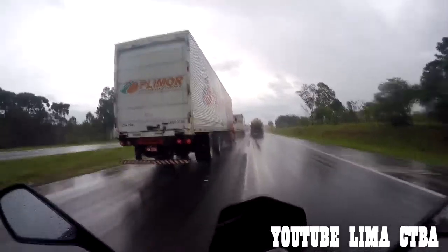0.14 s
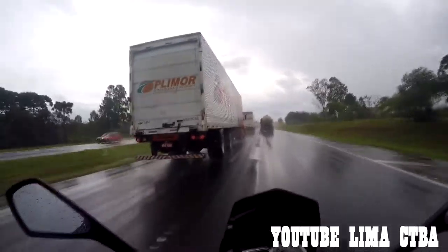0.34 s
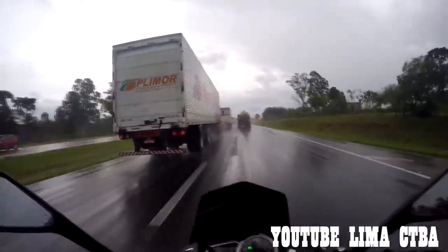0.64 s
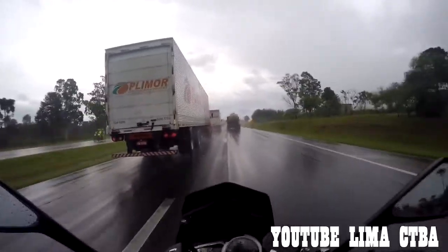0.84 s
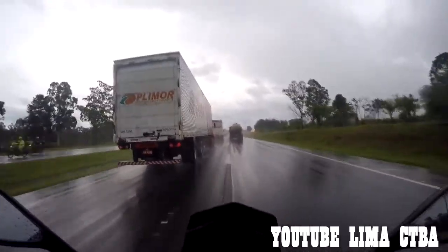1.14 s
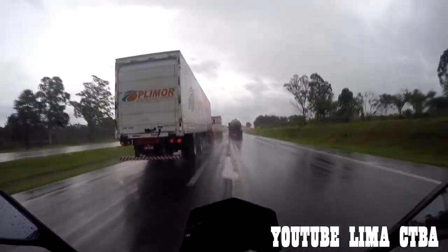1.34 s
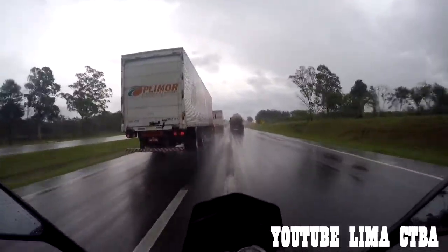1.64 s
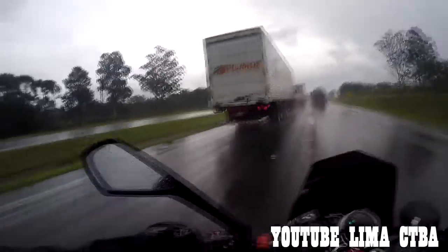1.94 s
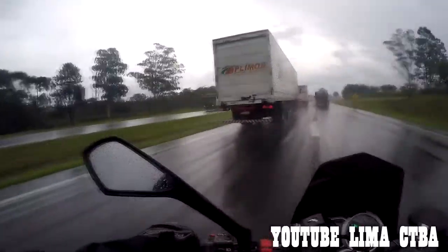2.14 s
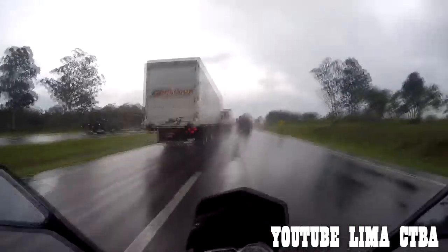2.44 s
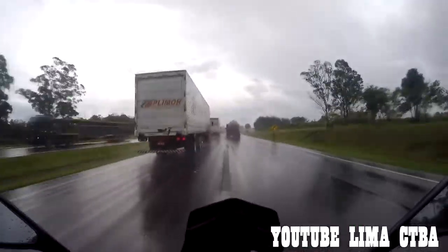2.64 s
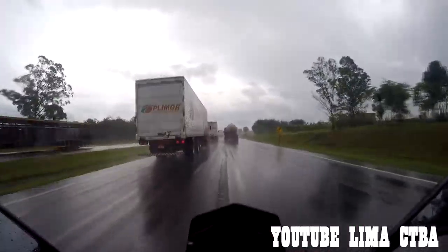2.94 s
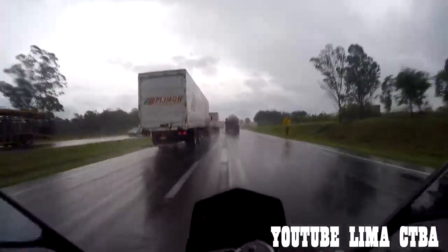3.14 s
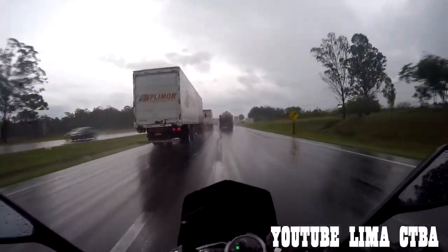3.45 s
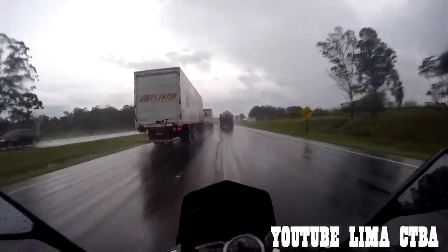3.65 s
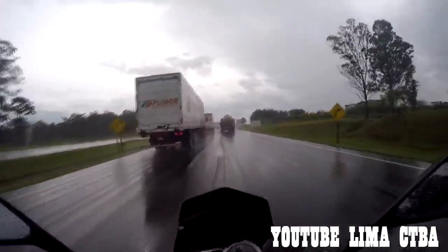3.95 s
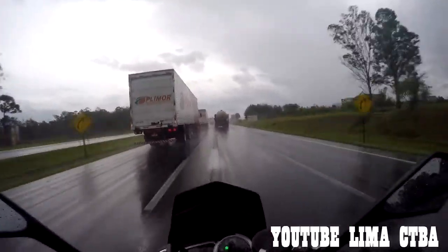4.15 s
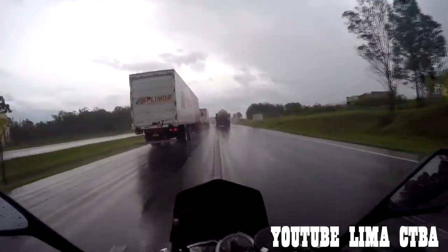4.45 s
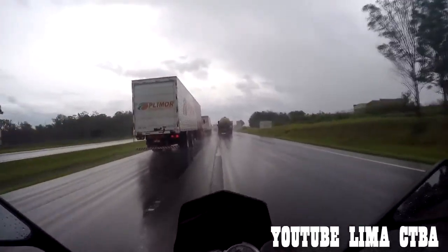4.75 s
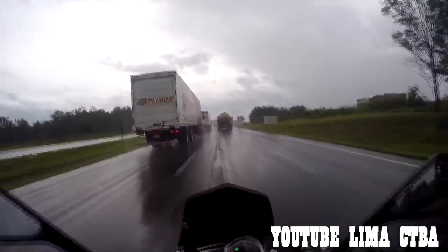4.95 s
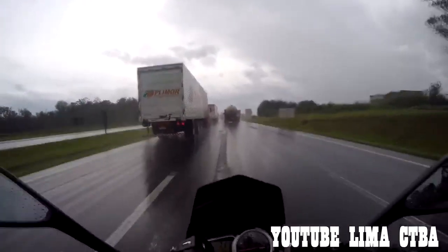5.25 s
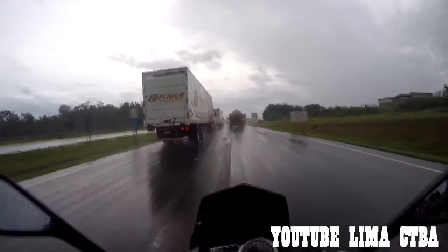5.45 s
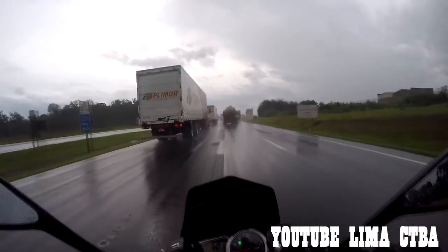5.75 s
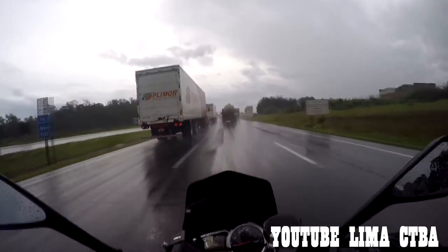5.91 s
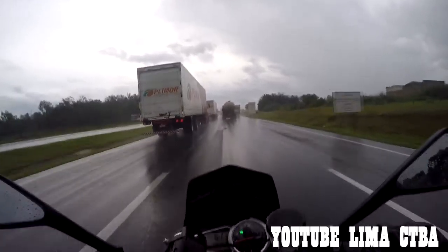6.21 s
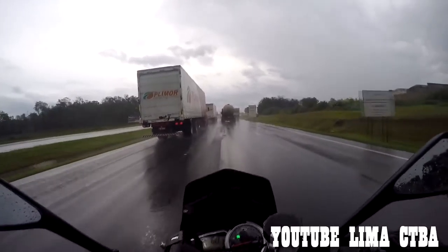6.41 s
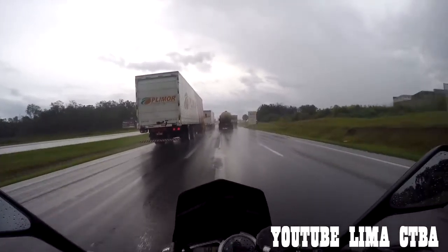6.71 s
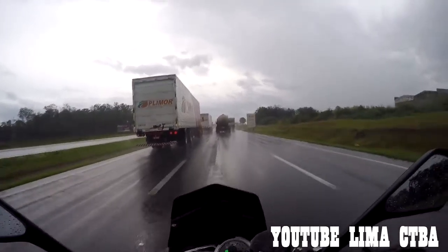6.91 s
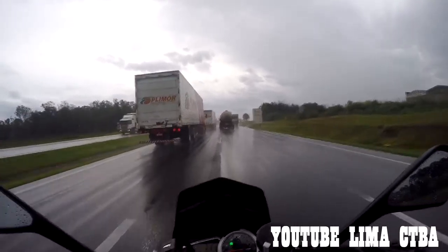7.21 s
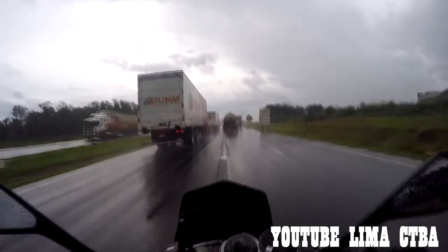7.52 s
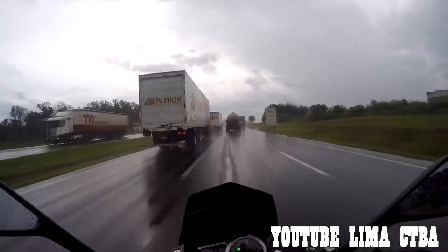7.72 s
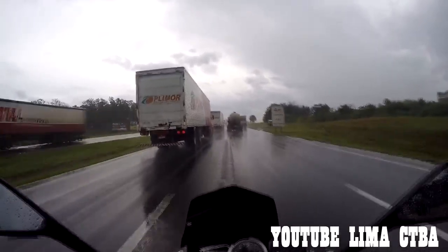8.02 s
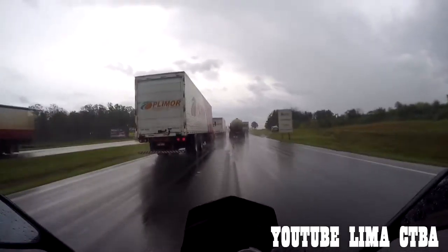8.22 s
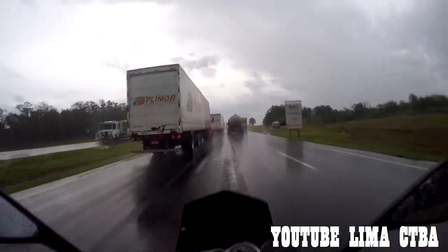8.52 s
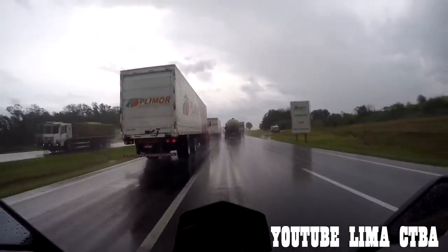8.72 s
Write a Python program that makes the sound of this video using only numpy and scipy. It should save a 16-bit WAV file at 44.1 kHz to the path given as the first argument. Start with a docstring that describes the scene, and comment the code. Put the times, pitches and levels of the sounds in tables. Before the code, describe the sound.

A motorcycle engine drones at cruising speed on a wet highway, with gusty wind buffeting the microphone and tyres hissing.

```python
"""A three-cylinder motorcycle cruises on a wet highway, heard from the rider's seat.
Periodic gas pulses make the exhaust drone, and tooth meshing makes the gears whine. The throttle
opens and eases three times: the engine's harmonics swell under load and the drone burbles when coasting.
Turbulent pressure buffets and crackles on the microphone, over the broadband rush of air and tyres."""
import sys
import numpy as np
from scipy import signal
from scipy.fft import rfft, irfft, next_fast_len
from scipy.io import wavfile
from scipy.ndimage import uniform_filter1d

SR = 44100
rng = np.random.default_rng(int(sys.argv[2]) if len(sys.argv) > 2 else 0)


def to_wav(sig):
    """Store sig (one row per channel, or 1-D mono) as 16-bit WAV at the path in sys.argv[1].

    Samples outside -1..1 are clipped; the rate is SR.
    """
    pcm = np.clip(np.atleast_2d(sig), -1, 1) * 32767
    pcm = np.round(pcm).astype(np.int16)
    wavfile.write(sys.argv[1], SR, pcm.T)  # frames by channels


N = 391166
T = np.arange(N) / SR
CRUISE_HZ = 138.9   # reference firing rate


# Slow course of the exhaust's fundamental: t/s, level/dB
DRONE_LEVEL = [(0, -20.5), (.7, -18.5), (1.1, -20), (1.75, -16), (2.2, -23), (2.7, -19), (4.2, -17.5),
               (4.7, -19), (5.25, -16), (5.7, -17.5), (6.85, -16.5), (7.3, -18), (7.8, -18), (8.3, -20),
               (8.87, -22)]

def exhaust_drone(firings, load_db, lull_db):
    """Gas pulses radiate a tone at the firing rate; random modulation makes it burble when coasting."""
    level_db, = in_time(DRONE_LEVEL)
    coasting = np.clip(1 - from_db(load_db), 0, 1)
    depth = 0.036 + 0.4 * coasting
    phase = 2 * np.pi * firings
    burble = drift(49) * np.sin(phase) + drift(42) * np.cos(phase)
    tone = (np.sqrt(2) * np.sin(phase) + depth * burble) / np.sqrt(1 + depth ** 2)
    return from_db(level_db - lull_db + 1.1 * drift(3.3)) * tone


# Resonance curve of the exhaust pipe: f/Hz, level/dB
PIPE_RESPONSE = [(255, -28), (268, -23), (280, -24.5), (292, -30), (308, -37.5), (319, -29), (384, -38),
                 (405, -31), (430, -26.5), (452, -32), (480, -34.5)]

def pipe_harmonics(firings, firing_hz, load_db):
    """Resonance: the second and third harmonics swell as they cross the pipe's modes, and with load."""
    out = np.zeros(N)
    for multiple, load_share in ((2, 0.62), (3, 1)):
        level_db = at_hz(PIPE_RESPONSE, multiple * firing_hz) + load_share * load_db
        out += harmonic(multiple, firings, level_db, flutter_db=2.13, waver_rad=0.08)
    return out


# Firing rate, rising in each pull and sinking between: t/s, f/Hz
FIRING_RATE = [(0, 128.4), (1.1, 136.4), (1.5, 133.8), (2, 129.3), (2.4, 127.9), (3, 132.5), (4.78, 144.1),
               (5.5, 135.3), (5.75, 134.1), (6, 135.9), (6.5, 140.2), (7.5, 150.8), (8.5, 160.1),
               (8.87, 156.4)]

def crank():
    """Phase is the integral of frequency: the slightly jittered count of firings, and the firing rate."""
    firing_hz, = in_time(FIRING_RATE)
    return np.cumsum(firing_hz * (1 + 0.00074 * drift(12))) / SR, firing_hz


# Throttle pulls: opening t/s, rise time/s, closing t/s, load level/dB, coasting level/dB,
# then the gain/dB of the low whine, the upper whine and the whistle
PULLS = [(-.3, 0.62, 1.14, 1, -12, -9.5, -1.5, -0.5), (1.62, 0.8, 4.55, 2, -8.5, -14, -0.5, 0.5),
         (5.62, 0.3, 8.6, 0, -21, -2, 1, -1)]

def throttle(close_s=0.11, ease_db_per_s=1.74):
    """Load follows the throttle, which opens, eases and shuts; each pull also sets three gear gains."""
    load_db, gear_db = PULLS[0][4], np.array(PULLS[0][5:])[:, None]
    for opens, rise_s, closes, pull_db, coast_db, *tones_db in PULLS:
        opening = np.clip((T - opens) / rise_s, 0, 1)
        closing = np.clip((T - closes) / close_s, 0, 1)
        load_db = load_db + opening * (pull_db - ease_db_per_s * (T - opens) - load_db)
        load_db = load_db + closing * (coast_db - load_db)
        gear_db = gear_db + opening * (np.array(tones_db)[:, None] - gear_db)
    return load_db, gear_db


# Engine overtones, the thirds due to unequal cylinders: multiple of the firing rate, relative level/dB
OVERTONES = [(2.33, -43), (3.33, -38.5), (3.67, -46), (4, -40), (4.33, -47), (5, -49), (5.33, -50),
             (5.67, -53), (6, -45), (6.33, -51), (7, -53), (7.33, -55), (8, -48), (8.33, -53), (8.67, -54),
             (9, -49), (9.33, -50), (9.67, -58), (10, -56), (10.33, -61), (10.67, -57), (11, -54),
             (11.33, -58), (12, -58), (12.33, -64), (13, -62), (15, -68), (16, -66)]
# Resonance curve of the cases and fairing: f/Hz, gain/dB
BODY_RESPONSE = [(300, 1), (900, 0), (1050, 3), (1220, 2), (1450, 2), (1600, 3.5), (1750, 5), (1950, -2),
                 (2120, 7), (2300, -7.5), (3600, -7), (3930, -2.5), (4120, 3), (4400, -4), (4750, -5.5),
                 (5100, -15.5)]

def engine_overtones(firings, firing_hz):
    """Source and filter: harmonics of the engine cycle excite the body, brighter at high revs."""
    tilt_db_per_octave = 0.0935 * (firing_hz - CRUISE_HZ)
    out = np.zeros(N)
    for multiple, db in OVERTONES:
        gain_db = at_hz(BODY_RESPONSE, multiple * firing_hz) + tilt_db_per_octave * np.log2(multiple / 9)
        out += harmonic(multiple, firings, db + gain_db, flutter_db=3.5, waver_rad=0.16)
    return out


# Spectral envelope of the clatter at mean engine speed: f/Hz, relative level/dB of each harmonic
RASP_SPECTRUM = [(500, -56), (900, -59), (1250, -62), (1700, -64), (2100, -68), (2500, -79), (3000, -82),
                 (3600, -83), (3900, -90)]

def valve_rasp(firings, firing_hz, rough_db=6.0):
    """Fourier series: valve and intake clatter repeats every three firings, with uneven strength."""
    size = 4096
    hz = np.arange(size // 2 + 1) * firing_hz.mean() / 3
    in_band = (hz > RASP_SPECTRUM[0][0]) & (hz < RASP_SPECTRUM[-1][0])
    amplitudes = from_db(at_hz(RASP_SPECTRUM, hz)) * in_band
    cycle = irfft(amplitudes * np.exp(2j * np.pi * rng.random(len(hz)))) * size / np.sqrt(2)
    position = firings / 3 % 1 * size
    return np.interp(position, np.arange(size), cycle) * from_db(rough_db * drift(65))


# Meshing tones (low whine, upper whine, two whistles): multiple of the firing rate, line width/Hz
GEAR_TONES = [(7, .9), (7.58, 2.5), (30.7, 14), (32.0, 24)]

def gear_whine(firings, firing_hz, load_db, gear_db, flutter_db=3.0):
    """Tooth meshing gives tones that grow with load; play in the gears broadens them by phase noise."""
    low_db, upper_db, high_db = gear_db + load_db
    revs_db = 0.214 * (firing_hz - CRUISE_HZ)
    levels = (low_db + revs_db - 38.5, upper_db + revs_db - 41.5, high_db - 68.5, high_db - 68.5)
    out = np.zeros(N)
    for (multiple, width_hz), db in zip(GEAR_TONES, levels):
        phase_walk = np.cumsum(rng.standard_normal(N)) * np.sqrt(2 * np.pi * width_hz / SR)
        play = uniform_filter1d(phase_walk, size=200) + 0.12 * drift(45)
        level_db = db + at_hz(BODY_RESPONSE, multiple * firing_hz) + flutter_db * drift(25)
        out += np.sqrt(2) * from_db(level_db) * np.sin(2 * np.pi * multiple * firings + play)
    return out


# Spectrum of the eddies: f/Hz, relative level/dB
BUFFET_SPECTRUM = [(8, -14.5), (18, 8), (30, -1.5), (55, -2), (100, -4.5), (170, -17), (240, -22),
                   (350, -28.5), (700, -41), (2000, -86.5)]

def wind_buffet(level_db):
    """Turbulence: large eddies press on the microphone as low-frequency noise."""
    eddies = noise(BUFFET_SPECTRUM)
    eddies /= np.sqrt(uniform_filter1d(eddies ** 2, size=2400) + 1e-6)   # level_db sets the strength
    return from_db(level_db + 0.28) * eddies


# Spectrum of the air stream: f/Hz, relative level/dB
RUSH_SPECTRUM = [(60, -20), (150, 7), (210, 7), (330, -0.5), (470, 3.5), (600, -3), (850, -6.5),
                 (1100, -10.5), (1400, -16), (1900, -40.5), (3000, -44.5), (6000, -81.5)]

def air_rush(level_db):
    """Flow noise: air passing round the fairing gives a broad band that flutters quickly."""
    return from_db(level_db + 3.5 + 1.3 * drift(45)) * noise(RUSH_SPECTRUM)


# Slow course of the air stream: t/s, then the relative level/dB of buffet, rush and tyre hiss
AIR_LEVELS = [(0, -19, -28, -48.5), (.55, -22.5, -29.5, -49.5), (1, -22, -27, -47.5),
              (1.3, -20, -28.5, -48.5), (1.55, -19.5, -31, -51), (2.2, -21, -29.5, -50.5),
              (2.85, -18.5, -29, -49.5), (4.1, -23.5, -29, -48.5), (4.9, -18, -27, -48.5),
              (5.12, -25, -32.5, -50.5), (5.5, -21.5, -31, -50), (6, -21, -29.5, -48.5),
              (6.9, -23, -29, -48), (7.25, -17.5, -29, -49.5), (7.55, -22.5, -33.5, -51.5),
              (8.1, -20, -29, -49.5), (8.55, -23, -29.5, -50), (8.87, -24.5, -32.5, -55)]
# Gusts on the microphone: centre t/s, duration/s, buffet gain/dB, rush gain/dB
GUSTS = [(0.127, .08, 1, 1.5), (1.152, .12, 6, 0.5), (2.1, 0.12, 1, 1.5), (2.893, .16, -3, 4),
         (4.643, 0.23, 5, -0.5), (4.823, 0.097, -8.5, 3), (5.564, .07, 8.5, 1), (5.81, .1, 8, 3.5),
         (6.86, .09, -1, 4), (7.154, .12, 2.5, 3), (7.334, .08, 5, 2.5), (7.741, 0.088, 0.5, 8),
         (8.005, 0.14, 4.5, 5.5), (8.09, .06, 3, 2), (8.4, 0.22, 6.5, 2.5), (8.507, .07, 6.5, 1.5),
         (8.709, 0.098, 12, 6)]
# Lulls in which wind and drone sink together: centre t/s, duration/s, depth/dB
LULLS = [(1.191, .08, 7.5), (1.97, .1, 1.5), (4.685, 0.087, 8), (5.096, .08, 4), (7.414, .1, 7),
         (7.54, .07, 3), (7.82, 0.091, 5), (8.155, 0.067, 4.5), (8.8, .07, 2)]

def air_stream():
    """Unsteady flow modulates the levels of buffet, rush and tyre hiss; also gives the lulls' depth."""
    buffet_db, rush_db, tyre_db = in_time(AIR_LEVELS)
    lull_db = sum(db * swell(s, length) for s, length, db in LULLS)
    thump_db = sum(db * swell(s, length) for s, length, db, _ in GUSTS) - lull_db
    gust_db = sum(db * swell(s, length) for s, length, _, db in GUSTS) - lull_db + 0.8 * drift(4.6)
    return buffet_db + thump_db + 2.5 * drift(14), rush_db + gust_db, tyre_db + 0.95 * gust_db, lull_db


# Sharp single ticks of wind crackle: t/s, relative level/dB
TICKS = [(0.147, -35), (0.3527, -37.5), (0.468, -41), (0.722, -36), (0.9844, -37), (1.029, -35),
         (1.131, -38), (1.1597, -37), (1.4182, -40), (1.927, -40), (2.1366, -38), (2.5, -40), (2.582, -38),
         (2.9188, -34), (3.161, -42), (3.404, -35), (3.5074, -39), (3.908, -37), (4.1184, -42), (4.26, -35),
         (4.562, -37), (4.8754, -41), (4.985, -38), (5.454, -40), (5.902, -42), (6.1415, -40),
         (6.4263, -37), (6.6236, -38.5), (6.8593, -36), (7.1397, -47), (7.327, -41), (8.038, -38),
         (8.4394, -42), (8.7001, -27)]
# Filter that colours each tick: f/Hz, gain/dB
TICK_RESPONSE = [(300, -1.5), (1500, 4), (3000, 5.5), (4800, 4), (7000, 1), (12000, -5), (16000, -10.5)]

def wind_crackle(pressure, rush_db, base_per_s=100, decay_s=0.00035):
    """Shot noise: tiny bursts cluster on pressure peaks, busier in strong wind, among set louder ticks."""
    per_s = base_per_s * from_db(2.6 * np.minimum(rush_db - rush_db.mean(), 3))
    strain = np.minimum(np.abs(rms_one(pressure)), 2.3) ** 4 * from_db(4 * drift(7))
    onsets = rng.random(N) < per_s / SR * strain / strain.mean()
    impulses = onsets * from_db(-55.5 + 5 * np.minimum(rng.exponential(1, N), 2))
    for s, db in TICKS:
        impulses[int(s * SR)] += from_db(db)
    envelope = signal.lfilter([1], [1, -np.exp(-1 / (decay_s * SR))], impulses + 1e-18)
    shared, left, right = rng.choice([-1, 1], (3, N))
    ears = (0.55 * shared + 0.88 * left, 0.55 * shared + 0.92 * right)   # partly correlated noise
    return np.array([colour(envelope * ear, TICK_RESPONSE) for ear in ears])


# Spectrum of tyres on the wet road: f/Hz, relative level/dB
TYRE_SPECTRUM = [(500, -20), (1200, 5.5), (2050, 2.5), (2450, -5.5), (3200, -10), (3800, -14), (4250, -14),
                 (4900, -24), (6000, -31.5), (15000, -52)]

def tyre_hiss(level_db, firings, throb=0.15):
    """Amplitude modulation: the hiss of wet tyres throbs with the engine's gas pulses."""
    pulsing = 1 + throb * np.sin(2 * np.pi * firings)
    return from_db(level_db + 3.5 + 0.15 * drift(43)) * noise(TYRE_SPECTRUM) * pulsing


# Spectrum of the faint hiss: f/Hz, relative level/dB
HISS_SPECTRUM = [(20, 24), (130, 24), (260, 5.5), (520, -7), (1000, -11.5), (2000, 6.5), (3000, -4.5),
                 (4200, -6), (5500, -15), (8000, -16), (11000, -30), (15000, -34.5)]

def stereo_hiss(tyre_db):
    """Uncorrelated noise: a faint hiss, different in each ear, rises and falls with the tyre hiss."""
    level_db = -53.5 + 0.7 * (tyre_db - tyre_db.mean())
    return from_db(level_db) * np.array([noise(HISS_SPECTRUM), noise(HISS_SPECTRUM)])


def harmonic(multiple, firings, level_db, flutter_db, waver_rad):
    """One engine partial, modulated in amplitude and phase by the moving air."""
    exact_multiple = round(3 * multiple) / 3
    phase = 2 * np.pi * (exact_multiple * firings + rng.random()) + waver_rad * drift(12)
    return np.sqrt(2) * from_db(level_db + flutter_db * drift(9.1)) * np.sin(phase)


def from_db(db):
    """Amplitude ratio of a level in decibels."""
    return np.exp(np.asarray(db) * (np.log(10) / 20))


def rms_one(x):
    """Normalisation to unit power."""
    return x / np.sqrt(np.mean(x ** 2) + 1e-20)


def in_time(rows):
    """Linear interpolation of a table's columns at every sample."""
    s, *columns = np.transpose(rows)
    return [np.interp(T, s, column) for column in columns]


def at_hz(points, hz):
    """Interpolation of a spectrum on a log-frequency axis."""
    f, db = np.transpose(points)
    return np.interp(np.log(np.maximum(hz, 1)), np.log(f), db)


def colour(x, spectrum):
    """Filtering by multiplication in the frequency domain."""
    size = next_fast_len(N)
    hz = np.arange(size // 2 + 1) * SR / size
    return irfft(rfft(x, size) * from_db(at_hz(spectrum, hz)), size)[:N]


def noise(spectrum):
    """Filtered Gaussian noise of unit power."""
    return rms_one(colour(rng.standard_normal(N), spectrum))


def drift(corner_hz):
    """Random fluctuation of unit power: noise through a two-pole low-pass."""
    step = 40   # samples between drawn points
    pole = np.exp(-2 * np.pi * corner_hz * step / SR)
    slow = signal.lfilter([1], [1, -2 * pole, pole * pole], rng.standard_normal(N // step + 2002))[2000:]
    return np.interp(np.arange(N) / step, np.arange(len(slow)), rms_one(slow))


def swell(centre_s, length_s):
    """Raised-cosine window of height 1."""
    return np.cos(np.pi * np.clip((T - centre_s) / length_s, -0.5, 0.5)) ** 2


def scene():
    """Superposition: engine and air are centred; only the faint hiss and crackle differ between ears."""
    load_db, gear_db = throttle()
    buffet_db, rush_db, tyre_db, lull_db = air_stream()
    firings, firing_hz = crank()
    exhaust = exhaust_drone(firings, load_db, lull_db) + pipe_harmonics(firings, firing_hz, load_db)
    growl = from_db(load_db) * (engine_overtones(firings, firing_hz) + valve_rasp(firings, firing_hz))
    engine = exhaust + growl + gear_whine(firings, firing_hz, load_db, gear_db)
    air = wind_buffet(buffet_db) + air_rush(rush_db) + tyre_hiss(tyre_db, firings)
    return engine + air + stereo_hiss(tyre_db) + wind_crackle(engine + air, rush_db)


def record(dry):
    """Soft saturation rounds the highest peaks, and a low-pass filter cuts the extreme treble."""
    ceiling, stopband_hz = 0.72, 16500
    rounded = dry / (1 + (dry / ceiling) ** 6) ** (1 / 6)
    return signal.sosfilt(signal.cheby2(14, 70, stopband_hz, fs=SR, output="sos"), rounded)


dry = scene()
out = record(dry)
to_wav(out)
```